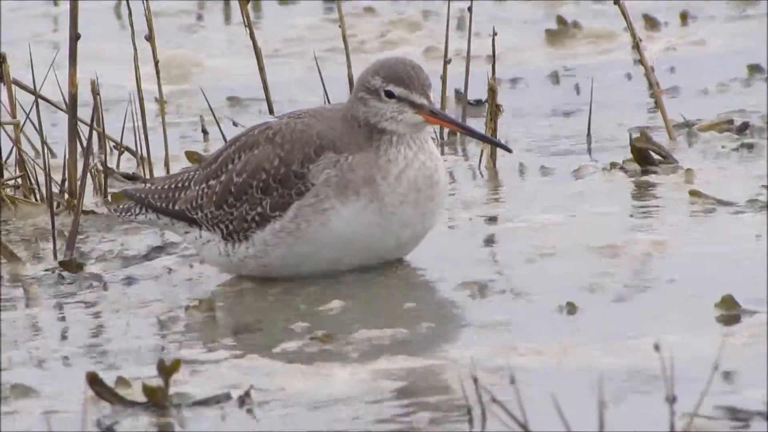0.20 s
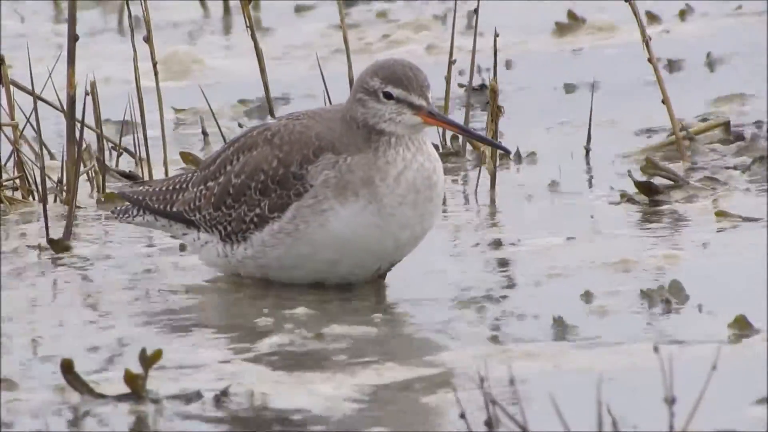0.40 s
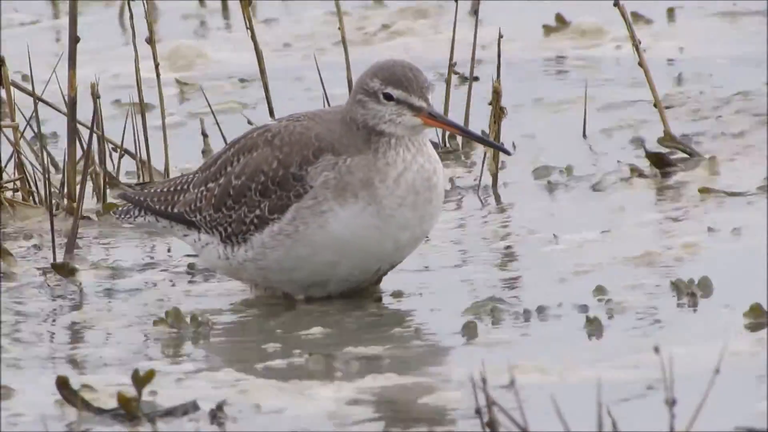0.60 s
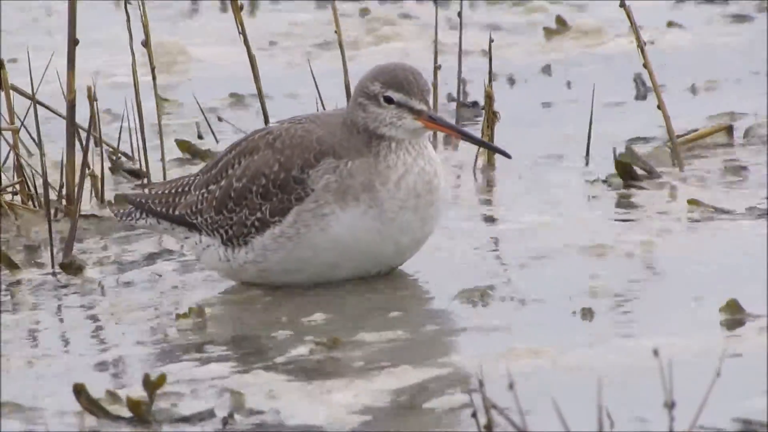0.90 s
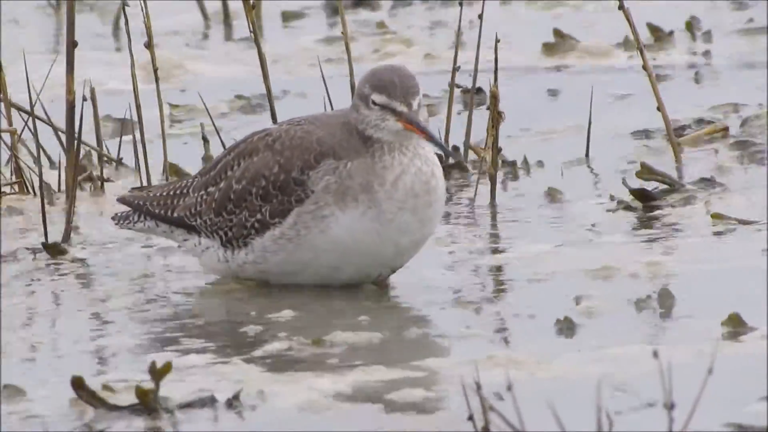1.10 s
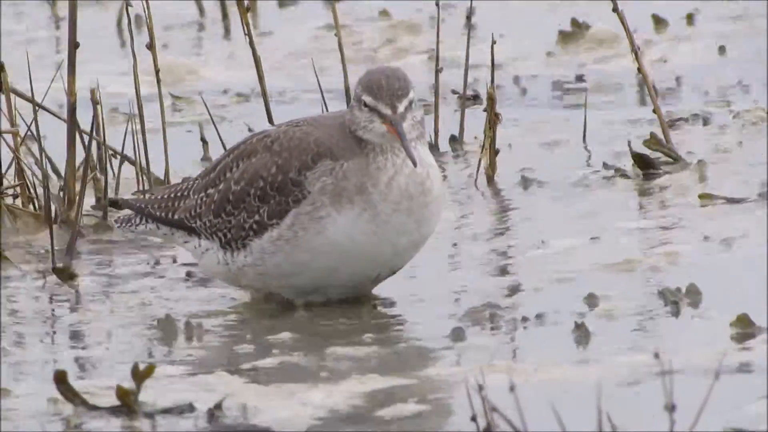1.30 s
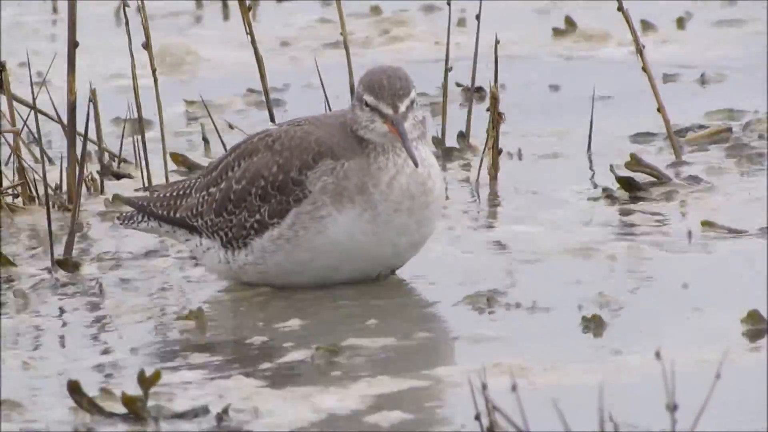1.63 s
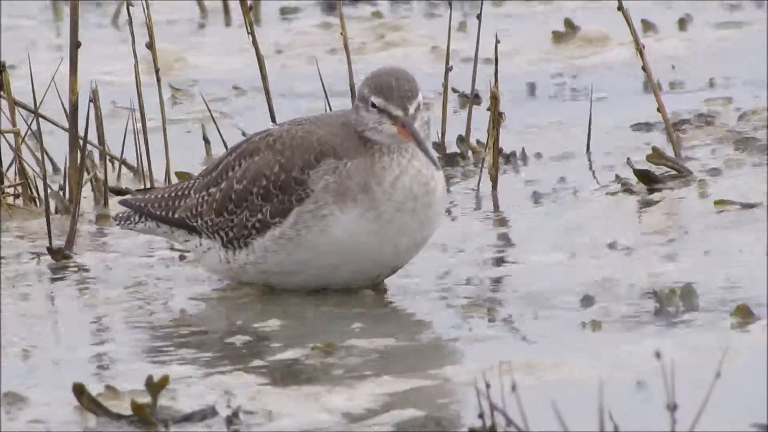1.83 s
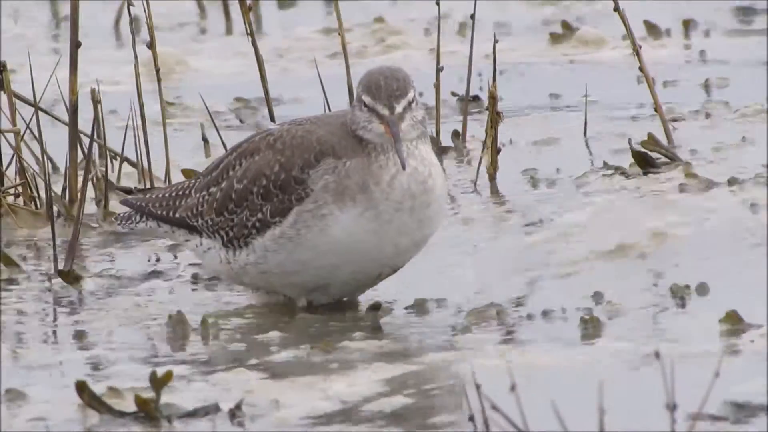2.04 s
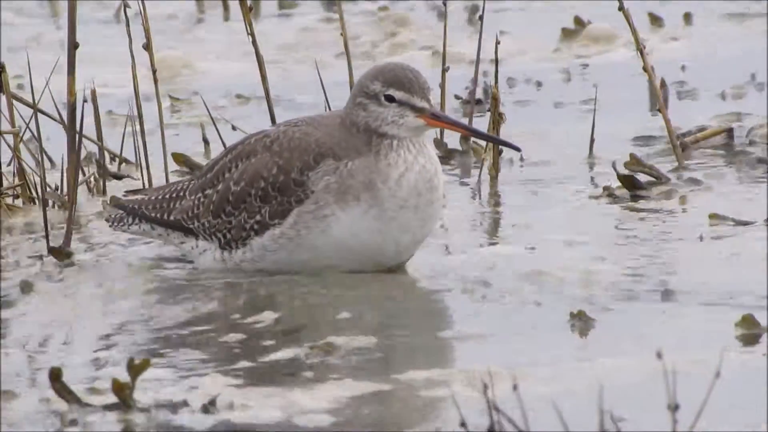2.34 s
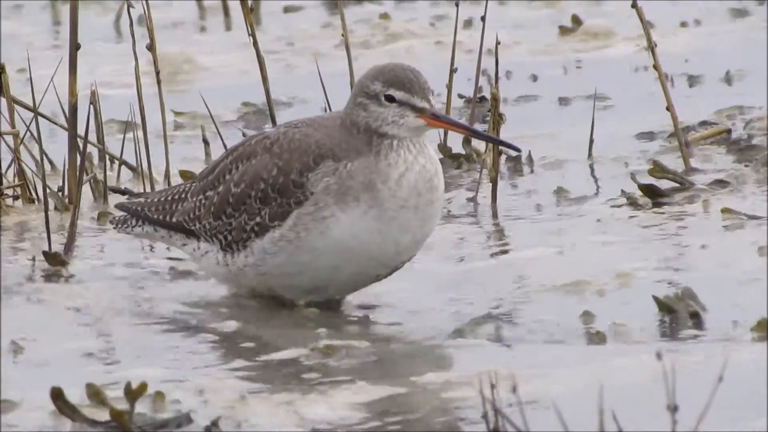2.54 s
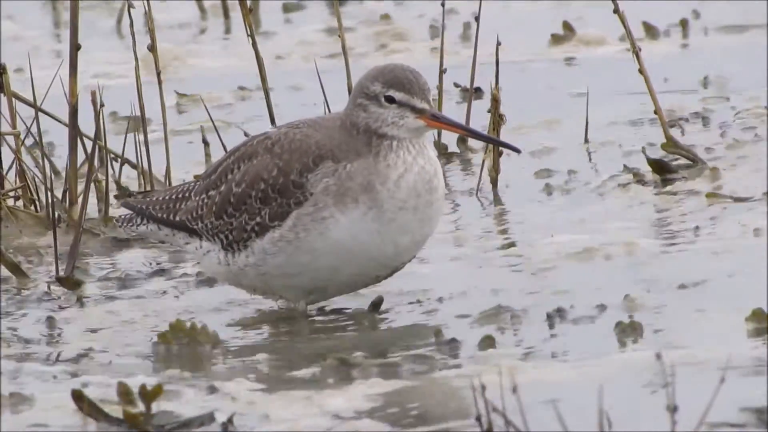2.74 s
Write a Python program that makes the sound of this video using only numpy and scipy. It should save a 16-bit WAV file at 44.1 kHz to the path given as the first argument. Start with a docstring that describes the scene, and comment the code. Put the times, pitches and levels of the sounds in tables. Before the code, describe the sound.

On an open muddy shore, a wader repeats a raspy, chattering note at an even pace, slightly right of centre. Low wind buffets the microphone throughout, strongest past the middle, over faint airy hiss.

```python
"""Wading bird on a windy, muddy shore

A bird repeats a harsh call: thin rising whines lead into arched tones, which a flap chops into a rattle
about 85 times a second, faster where the voice is raspy. One drop plips: a short tone gliding up.
Shaped noise makes the wind's rumble, wobbling low tones and noise its thumps on the microphone.
Under it lie a faint hiss of open air and the recorder's thin, steady whistle."""
import sys
import numpy as np
from scipy import signal
from scipy.fft import rfft, irfft
from scipy.io import wavfile

SR = 44100
rng = np.random.default_rng(int(sys.argv[2]) if len(sys.argv) > 2 else 0)


def master_out(mix):
    """Clip the mix to full scale and print it as 16-bit PCM to the path in sys.argv[1]."""
    frames = np.transpose(np.atleast_2d(mix))
    ceiling = np.clip(frames, -1, 1)
    pcm = np.round(ceiling * 32767).astype(np.int16)
    wavfile.write(sys.argv[1], SR, pcm)


N = 127890  # length of the scene in samples
SIDES = np.array([[1], [-1]])  # left and right, for differences between the channels

# Rattling notes: (start [s], length [s], pitch before arch and shake [Hz], level [dB],
# roundness [0-1], upper throat resonance [dB], rasp at the start [0-1])
NOTES = [(0.162, 0.22, 1045, -39.5, 0.17, 12.5, 0.13), (0.657, 0.24, 1029, -42, 0.05, 3.5, 0.13),
         (1.168, 0.25, 1032, -41.5, 0, 3.5, 0.25), (1.655, 0.3, 1075, -39.5, 0.71, 6.5, 0.03),
         (2.206, .383, 995.7, -42, 0.82, 8.5, 0.88), (2.842, 0.22, 994, -38.5, 0.98, 10.5, 0.3)]
# Soft voice of the whines and the low part of the notes, from the first harmonic up: (level [dB])
SOFT_HARMONICS = [-12, -4.5, -7.5, -2, -6.5, -6, -17, -11, -19, -30]
# Breathiness of the bird's voice: (frequency [Hz], level [dB])
BREATH = [(500, -54), (1100, -1.5), (1900, 14), (3000, -2), (4200, -13), (6000, 2.5), (7500, -29),
          (10000, -10), (15000, -34)]


def undb(db):
    """Turn decibels into a gain."""
    return 10 ** (np.asarray(db) / 20)


def unit(x):
    """Scale to an rms (average strength) of 1."""
    return x / np.sqrt(np.mean(x ** 2))


def noise(points):
    """Noise of rms 1, coloured by (frequency [Hz], level [dB]) points joined on a log frequency scale."""
    hz, db = np.array(points).T
    f = np.maximum(np.fft.rfftfreq(N, 1 / SR), 1)
    gain = undb(np.interp(np.log(f), np.log(hz), db))
    return unit(irfft(rfft(rng.standard_normal(N)) * gain, N))


def walk(rate):
    """Smooth random wandering of rms 1 that changes about rate times a second."""
    f = np.fft.rfftfreq(N, 1 / SR)
    smoothing = np.exp(-(2 * f / rate) ** 2 / 2)
    return unit(irfft(rfft(rng.standard_normal(N)) * smoothing, N))


def ramp(u):
    """Rise from 0 to 1 along a quarter sine, then stay there."""
    return np.sin(np.pi / 2 * np.clip(u, 0, 1))


def band(x, hz, kind, order):
    """Butterworth filter: keep the low, high or middle frequencies."""
    return signal.sosfilt(signal.butter(order, hz, kind, fs=SR, output="sos"), x)


def span(start, length):
    """Sample numbers of an event, and the time since its start [s]."""
    i = np.arange(int(start * SR) + 1, min(int((start + length) * SR), N))
    return i, i / SR - start


def voice(hz, levels_db):
    """Stack harmonics (whole multiples) on a moving pitch, scaled to rms 1."""
    phase = 2 * np.pi * np.cumsum(hz) / SR
    return unit(sum(undb(db) * np.cos((k + 1) * phase) for k, db in enumerate(levels_db)))


def wind():
    """Fluttering rumble that follows the gusts; the deepest part is shared by both channels."""
    # Wind strength over time: (time [s], level [dB])
    gusts = [(0, -7.5), (.18, -4), (.26, -0.5), (.42, -3), (0.521, -0.5), (.62, 4), (.8, 1), (.9, -6),
             (1.02, -3.5), (1.12, -5.5), (1.35, 4), (1.58, -2.5), (1.75, 6.5), (1.93, -0.5), (2.03, -2),
             (2.1, -2.5), (2.24, 0.5), (2.6, -0.5), (2.72, -5), (2.9, -0.5)]
    # Rumble shared by both channels: (frequency [Hz], level [dB])
    shared_rumble = [(22, -40), (40, -12.5), (70, 4), (130, 1), (200, -4), (300, -14), (900, -44),
                     (2000, -68)]
    # Rumble that pushes the channels opposite ways: (frequency [Hz], level [dB])
    side_rumble = [(20, -53), (60, -14), (120, -6.5), (200, 0.5), (320, -6.5), (900, -33), (2000, -52)]
    shared_db, side_db = -32, -41  # before the gusts
    flutter_db, flutter_per_s = 3.5, 32.5

    gust_db = np.interp(np.arange(N) / SR, *np.array(gusts).T)
    strength = undb(gust_db + flutter_db * walk(flutter_per_s))
    shared = undb(shared_db) * noise(shared_rumble)
    side = SIDES * undb(side_db) * noise(side_rumble)
    return strength * (shared + side)


def open_air():
    """Faint steady hiss, made wide by noise that is opposite in the two channels."""
    # Colour of the hiss: (frequency [Hz], level [dB])
    hiss = [(100, 7), (1000, 3.5), (2000, -5), (4000, -11), (8000, -14), (15000, -19.5)]
    air_db, side_db = -57.5, -2.5  # side level is relative to the shared hiss
    return undb(air_db) * (noise(hiss) + SIDES * undb(side_db) * noise(hiss))


def whines():
    """Soft, slightly breathy tone that rises before the rattle sets in and falls as it lets go."""
    # Whines that lead into a note:
    # (start [s], length [s], first pitch before shake [Hz], last pitch before shake [Hz], level [dB])
    lead_ins = [(0.097, 0.086, 569, 700, -51), (0.591, 0.098, 565, 702, -53.5),
                (1.104, 0.092, 572, 679, -53.5), (1.635, 0.039, 632, 748, -55.5),
                (2.817, 0.06, 545, 734, -57)]
    tail_s, tail_first_hz, tail_last_hz, tail_db = 0.027, 685, 557.6, -54

    # Every note that ends within the scene lets go in a short falling whine.
    tails = [(start + length - tail_s, tail_s, tail_first_hz, tail_last_hz, tail_db)
             for start, length, *_ in NOTES if start + length < N / SR]
    out, shake, breath = np.zeros(N), walk(600), noise(BREATH)
    for start, length, first_hz, last_hz, db in lead_ins + tails:
        i, t = span(start, length)
        glide_hz = first_hz + (last_hz - first_hz) * t / length
        tone = voice(glide_hz * (1 + 0.013 * shake[i]), SOFT_HARMONICS)
        fade = ramp(t / 0.0044) * ramp((length - t) / 0.002)
        out[i] += undb(db) * fade * (tone + breath[i] / 5)
    return out


def shore(x):
    """Place a sound slightly right and add short scatter from mud and reeds, different in each ear."""
    left_right_db, scatter_db, t60_s = -1.9, -15, 0.15  # t60: time to fade by 60 dB
    t = np.arange(SR // 2) / SR
    dull_noise = band(rng.standard_normal((2, len(t))), 3600, "low", order=1)
    tail = dull_noise * undb(-60 * t / t60_s) * ramp(t / 0.018)
    tail /= np.sqrt(np.sum(tail ** 2, axis=1, keepdims=True))
    direct = x * undb(SIDES * left_right_db / 2)
    return direct + undb(scatter_db) * signal.fftconvolve(x[None], tail, axes=1)[:, :N]


def notes():
    """A flap chops an arched tone into pulses that scoop up from a low voice; rasp adds chirps and noise."""
    # Harmonics of the note, from the first up: (harsh voice [dB], round voice [dB])
    harmonics = [(-11, -8.5), (3, 10.5), (4, -17.5), (2.5, -5.5), (-6.5, -16), (-17, -15), (-13, -31),
                 (-19.5, -35), (-47, -77)]
    # Colour of the rasp noise: (frequency [Hz], level [dB])
    rasp_colour = [(500, -31), (1200, -3), (1750, 0.5), (2700, -9), (3450, -29), (4100, -1), (5200, -6.5),
                   (6000, -2.5), (7200, -26), (9300, -19.5), (12000, -60.5)]
    # Pitch arch: each drop is a share of the pitch.
    rise, rise_s, fall, fall_s = .26, .014, .1, .012
    arch_bend, round_bend = .014, .08
    # Rattle: pulses per second; opening, closing and chirp end are shares of one flap cycle.
    base_rate, round_rate, rasp_rate, rattle_jitter = 83.5, 4, 17, .012
    gap_db, opening, closing, chirp_end = -18, .38, .17, .52
    # Pitch changes within a pulse and random shake, as shares of the pitch.
    scoop_depth, rasp_sweep, rasp_sag = .17, .6, .1
    jitter, rasp_jitter, pulse_scatter = .009, .05, .008
    rasp_hold, rasp_fade = .45, .52  # shares of the note
    low_ratio, low_db = .615, -7  # pitch and level of the low voice against the main tone
    breath_db, rasp_noise_db, rasp_tone_db = -12, -4.5, -1
    attack_s, release_s = .042, .047
    dull_db = 1  # loss per step up the harmonics when the effort is zero

    out, breath, shake, drift = np.zeros(N), noise(BREATH), walk(750), walk(62.4)
    grit, scatter = noise(rasp_colour), walk(280)
    harsh, rounded = np.array(harmonics).T
    steps = np.arange(len(harsh))
    for start, length, pitch_hz, db, roundness, throat_db, rasp0 in NOTES:
        i, t = span(start, length)
        u = t / length
        rasp = rasp0 * (1 - ramp((u - rasp_hold) / rasp_fade) ** 2)

        # The flap: cycle runs from 0 to 1 in every pulse; gap is 1 when shut and 0 when open.
        rate = base_rate + round_rate * roundness + rasp_rate * rasp ** 2
        cycle = np.cumsum(rate * (1 + rattle_jitter * drift[i])) / SR % 1
        gap = 1 - ramp(cycle / (opening * (1 - rasp / 2))) * ramp((1 - cycle) / closing)

        # Pitch: an arch over the note, a scoop or chirp in each pulse, and random shake.
        scoop = -scoop_depth * (1 - ramp(cycle / opening) ** 2)
        chirp = np.where(cycle < chirp_end, rasp_sweep * cycle / chirp_end - 2 * rasp_sag, -rasp_sag)
        bend = (arch_bend + round_bend * roundness * (1 - rasp0)) * (2 * u - 1) ** 2
        arch = 1 - rise * np.exp(-t / rise_s) - fall * np.exp((t - length) / fall_s) - bend
        unsteady = pulse_scatter * scatter[i] + (jitter + rasp_jitter * rasp) * shake[i]
        hz = pitch_hz * arch * (1 + scoop + rasp ** 2 * chirp + unsteady)

        # Tone colour: the throat lifts harmonics near 5800 Hz; low effort dulls the upper ones.
        throat = throat_db * np.exp(-(((steps + 1) * pitch_hz - 5800) / 1000) ** 2)
        effort = ramp(t / attack_s) * ramp((length - t) / release_s)
        colour = (harsh + roundness * (rounded - harsh) + throat)[:, None]
        colour = colour - dull_db * np.outer(steps, 1 - effort)
        tone = undb(rasp_tone_db * rasp) * voice(hz, colour)

        soft_hiss = undb(breath_db) * (1 - roundness / 2) * breath[i]
        rough_hiss = rasp * undb(rasp_noise_db) * grit[i]
        low_hz = low_ratio * pitch_hz * arch * (1 + 2 * unsteady)
        low = undb(low_db) * (1 - roundness / 2) * voice(low_hz, SOFT_HARMONICS)
        low_gate = ramp(cycle / closing) * (1 - cycle) ** 2
        chopped = undb(gap_db * gap) * (tone + soft_hiss + rough_hiss)
        out[i] += undb(db) * effort * (chopped + low_gate * low)
    return out


def thumps():
    """Eddies strike the microphone: short low pressure swings whose upper part splits the two channels."""
    # Thumps of wind; the push peaks a third of the way through its length:
    # (start [s], push level [dB], centre before wobble [Hz], length [s], left-right difference [dB])
    strikes = [(0.365, -17, 165, 0.0087, 0.5), (0.553, -17.5, 370, 0.0017, -9),
               (0.562, -17, 178, 0.014, 4.5), (0.614, -14, 339, 0.0038, -9), (0.718, -18, 174, 0.013, 6.5),
               (0.755, -15, 165, 0.0065, -6.5), (.952, -20, 114, 0.022, 2.5), (1.075, -17, 165, 0.0069, 0),
               (1.229, -17, 148, 0.011, 4), (1.33, -20, 189, 0.011, -0.5), (1.356, -18, 177, 0.01, 0),
               (1.542, -23, 217, 0.019, -5.5), (1.657, -15.5, 133.5, 0.012, 5),
               (1.695, -13, 108, 0.0091, 0), (1.711, -13, 161, 0.016, 6.5), (1.739, -4, 185, 0.012, 4.5),
               (1.872, -15, 228, 0.007, -2.5), (1.999, -28.5, 235, 0.037, -2),
               (2.197, -22, 250, 0.0053, -2), (2.431, -14, 122.5, 0.019, 2.5),
               (2.541, -14, 112, 0.014, 3.5), (2.573, -15.5, 160, 0.013, 2)]
    turbulent_s = 0.047  # pushes this long or longer are all turbulence
    eddy_db, side_gain, side_hz = 2, 2 * undb(1), 290.5

    out, wobble = np.zeros((2, N)), walk(200)
    for start, db, hz, length, pan_db in strikes:
        i, t = span(start, 0.14)
        swing = np.sin(2 * np.pi * np.cumsum(hz * np.exp(0.292 * wobble[i])) / SR)
        eddies = unit(band(rng.standard_normal(N), [hz / 2, hz * 1.504], "band", order=3))[i]
        broken = min(length / turbulent_s, 1)  # share of turbulence
        mix = np.sqrt(1 - broken ** 2) * swing + undb(eddy_db) * broken * eddies
        u = 3 * t / length
        push = undb(db) * u * np.exp(1 - u) * mix
        apart = side_gain * band(push, side_hz, "high", order=2)
        out[:, i] += (push + SIDES * apart) * undb(SIDES * pan_db / 2)
    return out


def drop():
    """A bubble rings briefly: its pitch glides up while the tone holds, then dies away."""
    start_s, first_hz, glide_hz_per_s = 1.4535, 970, 32000
    level_db, hold_s, decay_s = -38.5, 0.0077, 0.0054
    t = np.maximum(np.arange(N) / SR - start_s, 0)
    ring = np.sin(2 * np.pi * (first_hz * t + glide_hz_per_s * t ** 2 / 2))
    return undb(level_db) * ring * np.exp(-np.maximum(t - hold_s, 0) / decay_s)


def scene():
    """Bird and drop on the shore, wind on the microphone, faint open air."""
    return wind() + open_air() + shore(whines() + notes() + drop()) + thumps()


def record(dry):
    """The recorder thins the deepest rumble, adds a thin whistle and cuts the top."""
    whistle_hz, whistle_db, top_hz = 15734, -70.5, 15900
    whistle = undb(whistle_db) * np.sin(2 * np.pi * whistle_hz * np.arange(N) / SR)
    thinned = band(dry, 32, "high", order=2)
    # A steep filter: 0.2 dB ripple below the top, 70 dB down above it.
    top_cut = signal.ellip(10, .2, 70, top_hz, fs=SR, output="sos")
    return signal.sosfilt(top_cut, thinned + whistle)


dry = scene()
out = record(dry)
master_out(out)
```